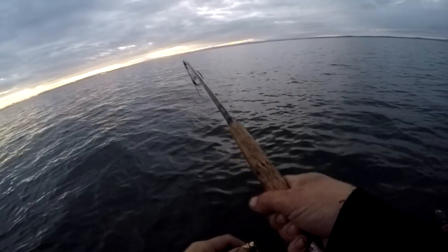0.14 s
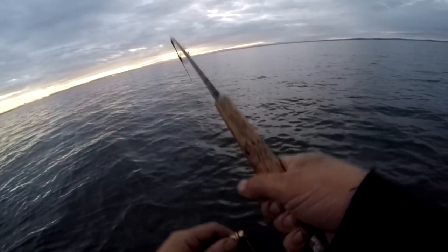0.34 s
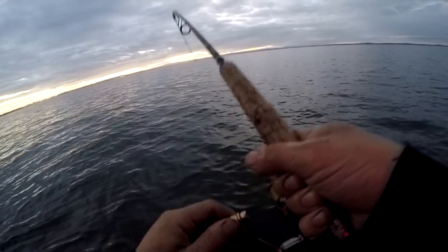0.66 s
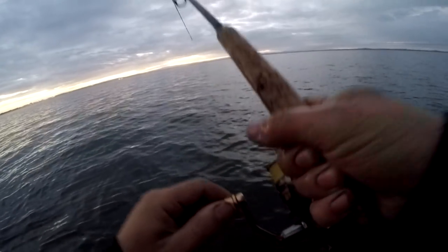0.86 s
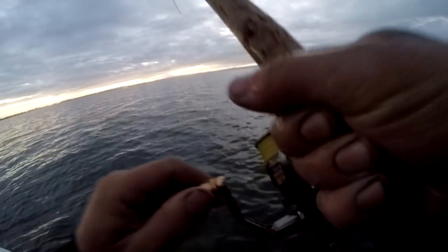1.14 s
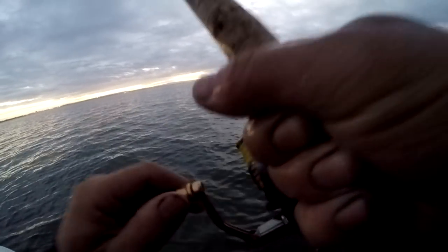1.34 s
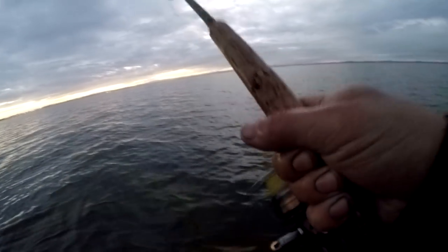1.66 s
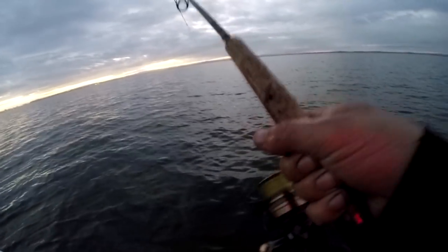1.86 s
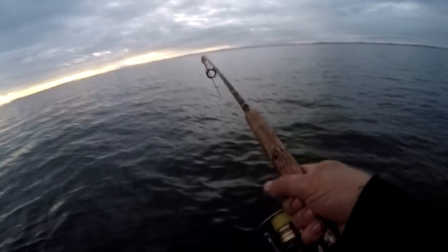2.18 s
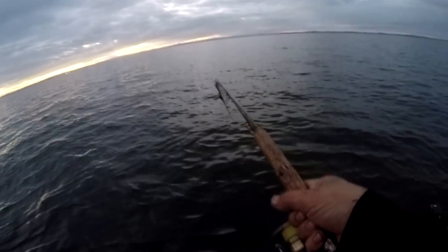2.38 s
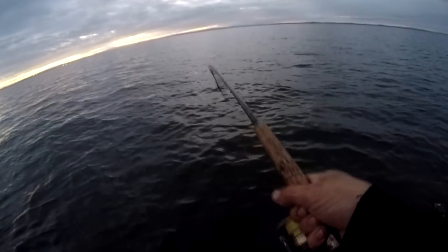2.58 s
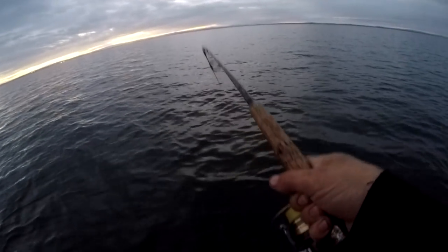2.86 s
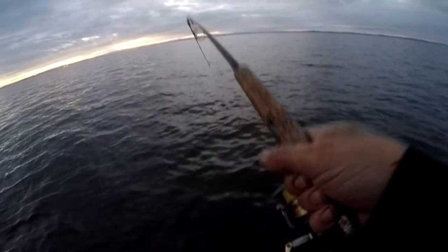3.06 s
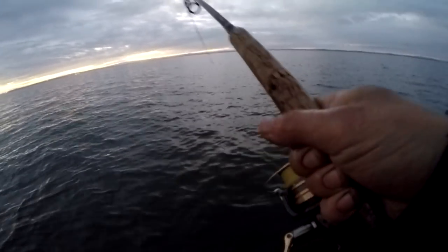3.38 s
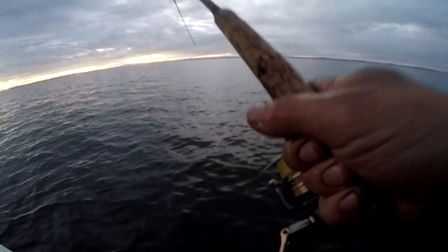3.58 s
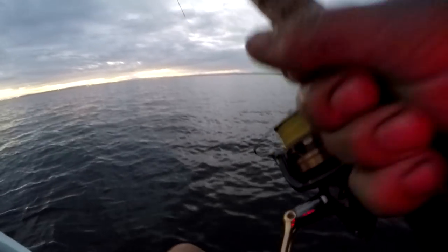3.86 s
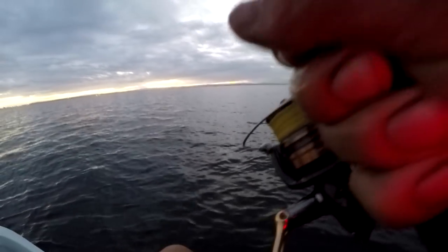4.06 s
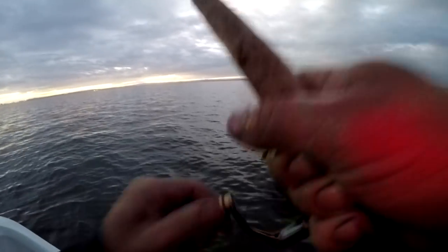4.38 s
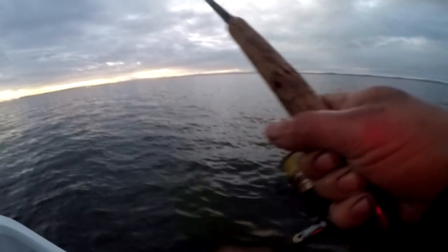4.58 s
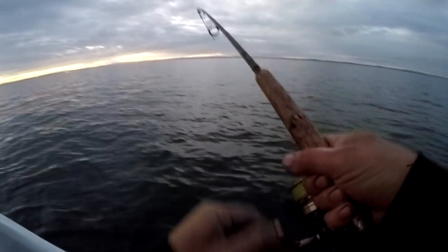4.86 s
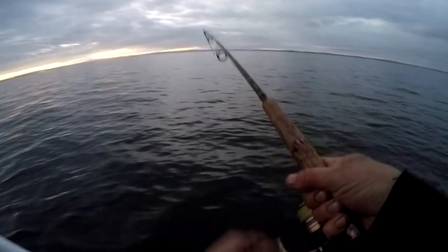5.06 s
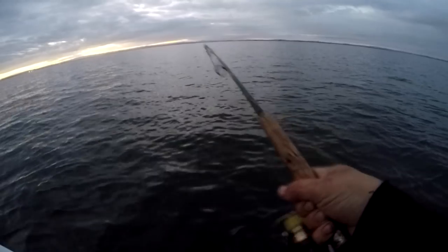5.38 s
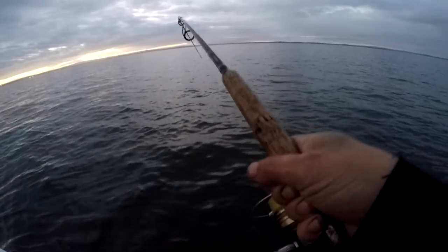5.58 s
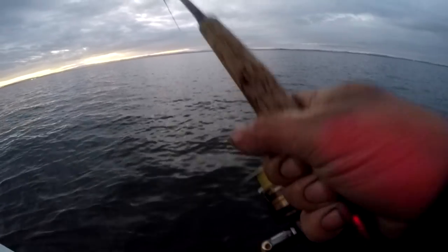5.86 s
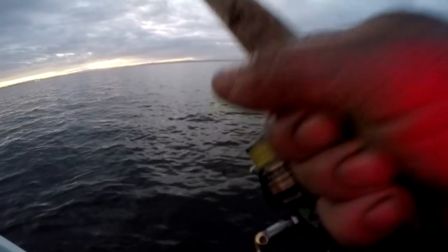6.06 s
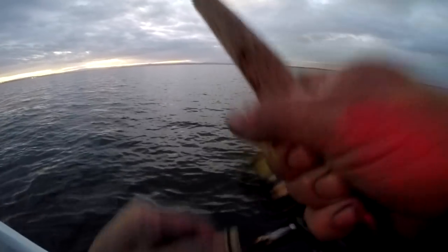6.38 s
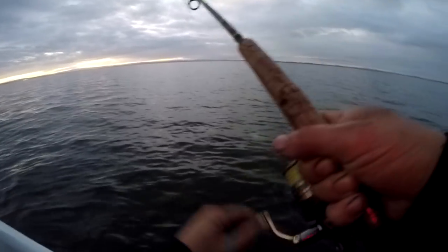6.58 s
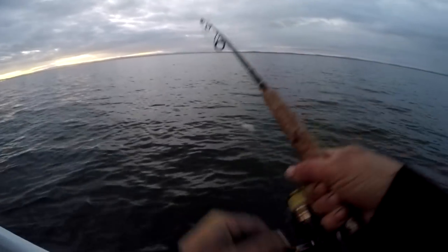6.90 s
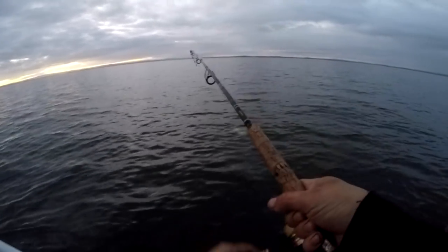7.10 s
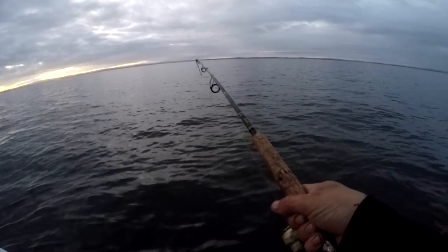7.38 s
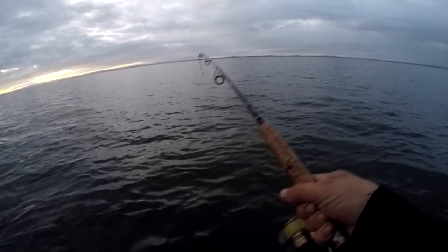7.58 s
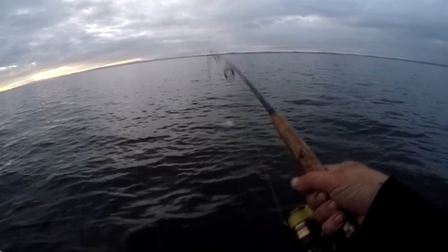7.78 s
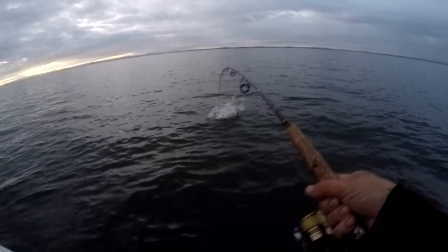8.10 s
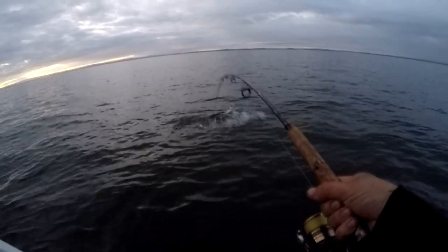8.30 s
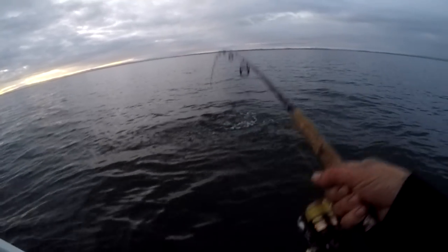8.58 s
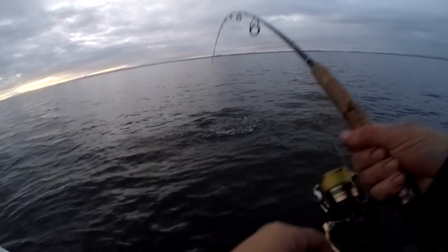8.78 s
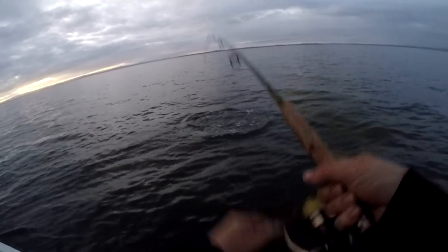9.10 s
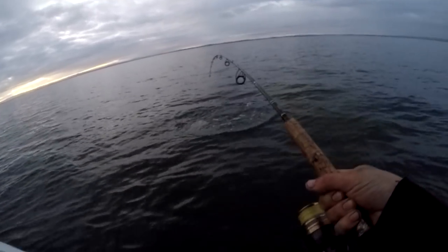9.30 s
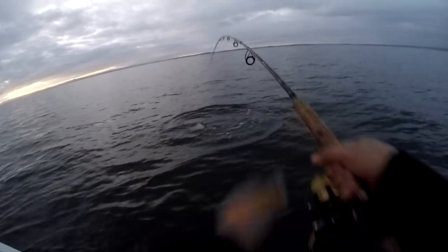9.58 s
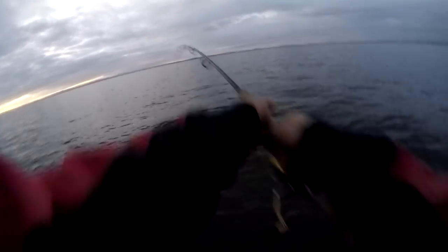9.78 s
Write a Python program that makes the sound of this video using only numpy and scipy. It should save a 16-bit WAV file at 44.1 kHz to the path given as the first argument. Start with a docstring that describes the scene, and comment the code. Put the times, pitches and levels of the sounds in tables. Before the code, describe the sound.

Close metallic reel ticks and soft gear whirring over low wind buffeting; a hard handle knock midway, then rod thumps, a fish splash and sleeve rustle.

```python
"""An angler in a small boat plays a fish, heard from a camera worn on the chest. From the start the drag clicks as
resonant snaps, a sleeve brushes by as filtered noise and waves plip as ringing bubbles. From 1.4 s the reel is
cranked in spells of pulsing noise; at 2.4 s and 8.4 s the fish takes line and the ticks run into a buzz. Decaying
modes make the handle's knocks from 4 s and the thumps of the jerked rod from 7.8 s; near 8.2 s the fish splashes in
bursts of noise, and at the end the arm sweeps past. Wind noise buffets and rumbles throughout, over a steady hiss."""
import sys
import numpy as np
from scipy.fft import rfft, irfft, next_fast_len
from scipy.io import wavfile
from scipy.ndimage import uniform_filter1d, map_coordinates

SR = 44100
rng = np.random.default_rng(int(sys.argv[2]) if len(sys.argv) > 2 else 0)


def transcribe(u):
    """Save the signal u as a 16-bit wav file named by the first command-line argument.

    u: samples, shape (n,) or (channels, n), limited to [-1, 1]; the rate is SR.
    q: integer samples, one column per channel.
    """
    v = np.clip(np.atleast_2d(u).T, -1, 1)
    q = np.round(v * 32767).astype(np.int16)
    wavfile.write(sys.argv[1], SR, q)


N = 438354  # length [samples]


def teeth(slip, first=0):
    """One row for each tooth that passes the pawl: its time, then the slip's other columns at that time."""
    s, rate, *cols = np.transpose(slip)
    t = np.arange(s[0], s[-1], 1 / SR)
    turned = np.cumsum(np.interp(t, s, rate)) / SR  # teeth passed so far
    times = np.interp(np.arange(first, turned[-1]), turned, t)
    return np.transpose([times] + [np.interp(times, s, col) for col in cols])


# The spool slips against the drag, one list a pull; the two rings are trimmed in drag():
# (time [s], teeth per second [1/s], tick level [dB], brightness [dB], click-spring ring [dB], rim ring [dB])
SLIPPING_PULLS = [
    [(1.518, 18.0, -48.0, -3.0, -72.5, -52.0), (1.596, 9.4, -49.0, -1.0, -69.5, -53.0),
     (1.841, 19.7, -47.5, 9.0, -71.0, -57.0), (1.971, 40.1, -46.0, 4.0, -76.5, -50.0),
     (2.018, 20.0, -47.5, -2.0, -73.0, -51.0), (2.132, 49.0, -48.5, 2.0, -64.0, -55.0),
     (2.258, 16.9, -47.5, 9.0, -71.0, -54.0), (2.348, 25.1, -51.0, 4.0, -71.0, -60.0),
     (2.398, 84.3, -51.5, -1.0, -69.0, -61.0)],
    [(2.736, 48.9, -56.5, -2.0, -75.0, -60.0), (2.807, 37.3, -54.0, 0.0, -74.0, -58.0),
     (2.863, 91.3, -52.0, 0.0, -71.0, -53.0), (3.071, 18.0, -53.5, 3.0, -82.0, -56.0),
     (3.199, 14.5, -55.0, 4.0, -76.0, -61.0), (3.325, 17.6, -53.0, 2.0, -81.0, -58.0)],
    [(3.369, 20.8, -52.5, -1.0, -80.0, -56.0), (3.437, 49.3, -49.5, 4.0, -77.0, -51.0),
     (3.567, 41.3, -47.5, 5.0, -73.0, -52.0), (3.702, 17.3, -51.0, 6.0, -78.0, -54.0),
     (3.998, 14.6, -50.0, -1.0, -78.0, -54.0), (4.193, 6.9, -48.5, -6.0, -80.0, -52.0)],
    [(4.297, 15.5, -48.0, -5.0, -77.0, -45.0), (4.387, 30.1, -49.0, -3.0, -73.0, -50.0),
     (4.501, 17.3, -52.0, 4.0, -67.0, -58.0), (4.726, 11.7, -50.0, 2.0, -67.0, -62.0),
     (4.89, 27.5, -49.0, -5.0, -76.0, -58.0)],
    [(4.933, 23.0, -51.5, -1.0, -74.0, -61.0), (5.183, 32.6, -51.5, -3.0, -76.0, -62.0),
     (5.23, 15.4, -51.5, 3.0, -72.0, -57.0), (5.306, 34.6, -50.5, -4.0, -73.0, -54.0),
     (5.396, 37.7, -52.0, 3.0, -79.0, -58.0), (5.436, 18.9, -49.0, -4.0, -73.0, -54.0),
     (5.484, 24.7, -52.0, -4.0, -77.0, -53.0), (5.579, 10.7, -52.5, 1.0, -75.0, -52.0)],
    [(5.733, 22.1, -53.5, 2.0, -77.0, -58.0), (5.863, 21.4, -52.5, -2.0, -75.0, -59.0),
     (6.029, 5.4, -51.0, 0.0, -75.0, -56.0)],
    [(6.403, 19.5, -45.5, -3.0, -77.0, -48.0), (6.451, 22.0, -45.5, -3.0, -72.0, -50.0),
     (6.724, 11.4, -52.5, 2.0, -64.0, -62.0), (6.811, 25.9, -49.0, -2.0, -71.0, -59.0),
     (7.033, 6.6, -52.5, -1.0, -81.0, -61.0), (7.16, 14.3, -54.0, -1.0, -74.0, -59.0)],
    [(7.627, 10.1, -51.0, -2.0, -78.0, -51.0), (7.728, 14.5, -52.5, -2.0, -81.0, -56.0),
     (7.771, 27.1, -47.0, -2.0, -74.0, -51.0), (7.846, 20.1, -51.0, 0.0, -74.0, -57.0),
     (7.93, 16.0, -52.0, 3.0, -64.0, -57.0), (8.014, 46.8, -53.0, 2.0, -74.0, -57.0),
     (8.178, 15.2, -49.0, -2.0, -76.0, -49.0)],
    [(8.197, 60.0, -50.5, -6.0, -66.0, -49.0), (8.229, 70.6, -49.0, -6.0, -64.0, -52.0),
     (8.335, 40.7, -50.0, -2.0, -75.0, -52.0), (8.405, 58.1, -56.0, -1.0, -68.0, -62.0)],
    [(8.611, 63.6, -55.0, -2.0, -71.0, -59.0), (8.709, 18.9, -51.0, -4.0, -76.0, -56.0),
     (8.784, 8.0, -49.5, -3.0, -77.0, -53.0), (8.962, 15.2, -48.0, -5.0, -78.0, -50.0)],
    [(9.024, 39.0, -48.0, -6.0, -81.0, -51.0), (9.172, 16.8, -50.5, 0.0, -80.0, -60.0),
     (9.234, 28.5, -51.5, -1.0, -76.0, -59.0), (9.273, 8.2, -53.0, 0.0, -74.0, -58.0),
     (9.361, 10.3, -53.5, 1.0, -71.0, -58.0), (9.4, 50.7, -51.0, -3.0, -70.0, -61.0),
     (9.518, 26.7, -50.0, -5.0, -71.0, -63.0), (9.556, 58.6, -49.5, -6.0, -77.0, -57.0)],
]
# Between pulls the spool creeps by a single tooth: (time [s], level [dB])
SINGLE_CREEPS = [(0.011, -52), (0.0437, -53), (0.1734, -54.5), (0.4214, -55), (0.6485, -53),
                 (0.7389, -51.5), (0.9034, -52), (1.204, -48), (6.2182, -47.5), (7.3113, -50.5),
                 (7.452, -50.5)]
CREEP_BRIGHT_DB, CREEP_SPRING_DB = -2, -75
# The fish takes line, one list a run: (time [s], ticks per second [1/s], level [dB])
LINE_RUNS = [
    [(2.395, 88, -51), (2.43, 117, -52), (2.49, 137, -52.5), (2.53, 220, -54), (2.56, 245, -54.5),
     (2.595, 240, -52), (2.635, 214, -55.5), (2.68, 220, -52.5), (2.705, 150, -53), (2.732, 79, -56)],
    [(8.405, 68, -54), (8.44, 97, -51.5), (8.485, 107, -50.5), (8.54, 123, -52), (8.58, 96, -53),
     (8.606, 55, -60)],
]
RUN_BRIGHT_DB, RUN_SPRING_DB = -2.5, -69.5
CREEP_RIM_DB, RUN_RIM_DB = -6.5, -0.5  # rim ring relative to the tick, before the trim in drag()


def ticks():
    """Every tick of the drag in order: (time [s], level, brightness, spring and rim [dB])."""
    rows = [(s, db, CREEP_BRIGHT_DB, CREEP_SPRING_DB, db + CREEP_RIM_DB) for s, db in SINGLE_CREEPS]
    for pull in SLIPPING_PULLS:
        rows += [tuple(tick) for tick in teeth(pull)]
    for run in LINE_RUNS:
        rows += [(s, db, RUN_BRIGHT_DB, RUN_SPRING_DB, db + RUN_RIM_DB) for s, db in teeth(run, first=.5)]
    return np.array(sorted(rows))


# Resonances of the drag's pawl and spool: (frequency [Hz], width [Hz], level [dB])
PAWL_RESONANCES = [(2810, 660, 1), (4970, 270, 1), (5614, 290, 3.5), (7470, 740, -1), (8740, 420, 1),
                   (11120, 630, 4.5), (13400, 740, -4.5), (14560, 180, 2)]
# Modes of the drag's click spring: (frequency [Hz], level [dB], t60 [s])
CLICK_SPRING = [(7670, 5, .21), (7750, -1, .16)]
# Modes of the spool's rim, low then high: (frequency [Hz], level [dB], t60 [s])
RIM_MODES = [(3767, -13.5, 0.089), (4744, 0.5, 0.028)]


def drag(snap_t60=0.013, rise_s=0.0002, fresh=0.63, drift_db=3.5, size_scatter_db=1.25, ring_scatter_db=4.0,
         spring_trim_db=1, rim_trim_db=1, bright_scatter_db=2, rest_s=0.08, rested_db=5):
    """The pawl snaps off each tooth; neighbouring teeth sound alike, so the colour drifts as the spool turns."""
    s, db, bright_db, springs_db, rims_db = ticks().T
    t = np.arange(SR // 6) / SR
    short = t[:SR // 25]
    grit, new, chance = rng.standard_normal((len(s), 3, len(short))).transpose(1, 0, 2)
    # part of the grit is shared by neighbouring teeth, part is fresh
    grit = unit(uniform_filter1d(grit, size=7, axis=0)) + fresh * new
    snaps = grit * amp(-60 * short / snap_t60) * (1 - np.exp(-short / rise_s))
    # the turning spool shows the microphone now one resonance, now another
    drift = unit(uniform_filter1d(chance.T[:len(PAWL_RESONANCES)], size=5, axis=1))
    pawl = body([(hz, width, peak_db + drift_db * d[:, None])
                 for (hz, width, peak_db), d in zip(PAWL_RESONANCES, drift)])
    # a hard, bright contact mainly drives the pawl's upper resonances
    hardness_db = bright_db + bright_scatter_db * chance[:, -2]

    def tilt(hz):
        return amp(hardness_db[:, None] * np.interp(hz, [7000, 10500, 12000, 14000], [0, 1, 1, .2]))

    snaps = filtered(snaps, lambda hz: pawl(hz) * tilt(hz))
    snaps /= snaps[:, :SR // 250].std(axis=1, keepdims=True)  # even out the first 4 ms
    snaps *= amp(db + size_scatter_db * chance[:, -1])[:, None]
    # the rim's low mode rings more freely when the spool is nearly still
    rests = np.minimum(np.diff(s, prepend=0) / rest_s, 1)
    (low_hz, low_db, low_t60), high_mode = RIM_MODES
    rims, springs = amp(rims_db + rim_trim_db), amp(springs_db + spring_trim_db)
    out = np.zeros(N)
    for at, snap, rim, spring, rest in zip(s, snaps, rims, springs, rests):
        add(out, at, snap)
        rim_modes = [(low_hz, low_db + rested_db * rest, low_t60), high_mode]
        bend = 1 + rng.normal() / 280  # the pitch of spring and rim shifts a little with the load
        side = rng.choice([-1, 1])  # each tooth catches the rim at another point
        add(out, at, side * rim * ring(rim_modes, bend * t, ring_scatter_db))
        add(out, at, spring * ring(CLICK_SPRING, bend * t, ring_scatter_db))
    return out


# Colour of the reel's whirr: (frequency [Hz], level [dB])
WHIRR_SPECTRUM = [(290, -64), (500, -23), (605, -26), (746, -5.5), (848, -17), (945, -8.5), (1480, -18.5),
                  (1680, -5), (1920, 1), (2220, -5), (2330, -5), (2720, -10.5), (2980, -4.5), (3500, -18),
                  (4400, -23.5), (5720, -35), (9680, -120)]
# Spells of turning the reel: (start [s], length [s], whirr level at the start [dB])
CRANK_SPELLS = [(1.36, 0.21, -63), (1.64, 0.38, -52), (2.19, 0.11, -56), (2.39, 0.29, -54.5),
                (2.54, 0.13, -53), (2.82, .14, -60.5), (3.42, 0.5, -64), (4.03, 0.22, -59.5),
                (4.27, 0.54, -49), (4.88, 0.54, -53), (5.06, 0.058, -52), (5.42, 0.5, -65),
                (6.07, .38, -64.5), (6.49, 0.15, -50.5), (6.72, 0.24, -52.5), (7.0, .04, -56.5),
                (7.1, 0.097, -54), (7.24, 0.12, -61), (7.68, 0.39, -61)]
CRANK_ATTACK_S, CRANK_SAG_DB_PER_S, CRANK_RELEASE_S = 0.06, 3.5, 0.05
# The rotor rubs and groans: (start [s], length [s], level at the start before the groan trim [dB])
ROTOR_GROANS = [(.8, .65, -80), (4.06, 0.086, -60), (4.26, 0.068, -53), (4.44, 0.16, -63),
                (6.27, 0.16, -71)]


def gears(groan_trim_db=1, mesh_hz=104, mesh_depth=0.043):
    """The whirr pulses with the gear teeth; the rubbing rotor drives one low resonance of the reel."""
    mesh_rate = mesh_hz * (1 + 0.11 * wobble(2.8))
    mesh = 1 + mesh_depth * np.sin(2 * np.pi * np.cumsum(mesh_rate) / SR)
    whirr = off_the_hands(noise(colour(WHIRR_SPECTRUM), grain_db=2) * mesh * amp(0.67 * wobble(35)))
    groan = noise(lambda hz: body([(778, 90, 0)])(hz) ** 2)
    turning = strokes(CRANK_SPELLS, CRANK_ATTACK_S, CRANK_SAG_DB_PER_S, CRANK_RELEASE_S)
    rubbing = strokes(ROTOR_GROANS, attack_s=0.059, sag_db_per_s=-7, release_s=0.021)
    return turning * whirr + line_rub(turning) + amp(groan_trim_db) * rubbing * groan


def line_rub(turning, rub_db=-9, rub_hz=1550, wander_octaves=.3):
    """The line rubs over its roller with a rough note that wanders as the tension changes."""
    phase = 2 * np.pi * np.cumsum(rub_hz * 2 ** (wander_octaves * wobble(7))) / SR
    grip = unit(uniform_filter1d(rng.standard_normal((2, N)), size=200, axis=1))
    note = grip[0] * np.sin(phase) + grip[1] * np.cos(phase)
    return amp(rub_db) * turning * unit(amp(2.2 * wobble(9)) * note)


# Resonances of the spinning spool: (frequency [Hz], width [Hz], level [dB])
SPINNING_SPOOL = [(2060, 110, 0), (2350, 130, 3.5), (3060, 110, 7), (3580, 160, -1), (4750, 92, -9),
                  (8100, 480, -8)]


def spool(whizz_db=-48):
    """In the first, fast run line whizzes off the spool, louder with speed; whizz_db holds at top speed."""
    s, rate, _ = np.transpose(LINE_RUNS[0])
    speed = np.interp(now(), s, rate / rate.max(), left=0, right=0)
    return amp(whizz_db) * speed ** 2 * noise(body(SPINNING_SPOOL), grain_db=3)


# Knocks of the handle: (time [s], hollow ring level [dB], clack level [dB], clack pitch [Hz])
HANDLE_KNOCKS = [(3.977, -62, -42, 1960), (4.004, -46.5, -50, 1190), (4.126, -54, -47, 1306),
                 (4.3565, -27.5, -32, 1794), (6.276, -49, -42, 1105), (6.279, -45, -47, 1990),
                 (6.306, -48, -46, 1900)]
# Modes of the reel's hollow body: (frequency [Hz], level [dB], t60 [s])
HOLLOW_REEL = [(791, -3.5, 0.071), (760, -32, 0.04), (335.8, -19, 0.052)]


def handle(clack_t60=0.033, crack_db=-2):
    """Play in the handle clacks and rings the reel's hollow body."""
    out, t = np.zeros(N), np.arange(SR // 8) / SR
    for s, hollow_db, clack_db, hz in HANDLE_KNOCKS:
        clack = ring([(hz, -3, clack_t60)], t) + amp(crack_db) * burst(hz, t, clack_t60)
        add(out, s, amp(hollow_db) * ring(HOLLOW_REEL, t) + amp(clack_db) * clack)
    return out


# Jerks of the rod:
# (time [s], rasp level [dB], rasp length [s], shrill level relative to the rasp [dB], thump level [dB])
ROD_JERKS = [(7.773, -41.5, 0.0059, -5.5, -31), (9.236, -39, 0.0059, -7.5, -34.5),
             (9.317, -34.5, 0.0088, -11, -39), (9.407, -38.5, 0.0044, 4, -32.5)]
# Resonances of the rasp: (frequency [Hz], width [Hz], level [dB])
RASP_RESONANCES = [(810, 560, -20), (1921, 20.4, 8.5), (2500, 340, -20), (7100, 1000, -32.5)]
# Resonances of the shrill part: (frequency [Hz], width [Hz], level [dB])
SHRILL_RESONANCES = [(3230, 67, 1.5), (4570, 200, -13), (5370, 300, -16.5)]


def rod(thump_delay_s=0.0139, thump_rise_s=0.0041):
    """Each jerk rasps briefly; a soft thump then reaches the camera through the angler's body."""
    out, t = np.zeros(N), np.arange(SR // 4) / SR
    rasp, shrill = noise(body(RASP_RESONANCES)), noise(body(SHRILL_RESONANCES))
    for s, db, length, shrill_db, thump_db in ROD_JERKS:
        width = np.where(now() < s, length / 2, length)  # swells faster than it fades
        swell = 1 / (1 + ((now() - s) / width) ** 4)
        jerk = unit(swell * rasp) + amp(shrill_db) * unit(swell * shrill)
        out += amp(db) * jerk * np.sqrt(np.mean(swell ** 2))
        thump = ring([(60, 0.0, 0.15), (103.6, 2.0, 0.19), (147, -6, 0.14)], t)
        add(out, s + thump_delay_s, amp(thump_db) * thump * (1 - np.exp(-t / thump_rise_s)))
    return out


# The sleeve brushes the jacket: (start [s], length [s], level [dB])
SLEEVE_BRUSHES = [(0, 0.014, -50.5), (.06, .06, -71.5), (.16, 0.061, -62), (.27, 0.034, -78),
                  (8.95, 0.23, -60.5), (9.15, 0.27, -52.5), (9.48, 0.063, -58)]
# The arm sweeps up past the camera: (time [s], level before the trims in jacket() [dB])
ARM_SWEEP = [(9.62, -67), (9.784, -46), (9.93, -35), (9.94, -39)]
# Colour of the sliding cloth: (frequency [Hz], level [dB])
CLOTH_SPECTRUM = [(120, -38), (200, -18), (292, -1.5), (418, -42), (735, -8.5), (967, -11), (1390, -12.5),
                  (1640, -5), (2160, -1), (2520, -11.5), (3050, -8), (3740, -24.5), (5270, -25),
                  (8230, -41), (12000, -42), (15600, -70), (22000, -120)]
# The jacket shifts against the camera's case: (start [s], length [s], level at the start [dB])
JACKET_SHIFTS = [(1.7, 0.082, -61.5), (5.04, 0.14, -58.5), (8.33, 0.16, -63)]
# Resonances of the case, rubbed by cloth: (frequency [Hz], width [Hz], level [dB])
CASE_RESONANCES = [(171, 44, 2.5), (306, 58, -4.5)]
# The sleeve swishes in glides: (start [s], end [s], start pitch [Hz], end pitch [Hz], level [dB])
SLEEVE_SWISHES = [(0, 0.324, 3340, 3290, -68), (4.507, 4.603, 1166, 1350, -57),
                  (4.636, 4.723, 1294, 1510, -60), (4.703, 4.786, 1650, 1990, -48),
                  (6.479, 6.733, 1253, 827, -60), (9.113, 9.248, 1403, 1290, -56.5)]


def jacket(sweep_trim_db=1, case_trim_db=-8):
    """Stiff cloth slides close to the camera; its weave sings a rough note that follows the speed of the arm."""
    sweep = level(ARM_SWEEP)
    stroke = strokes(SLEEVE_BRUSHES, attack_s=0.05, sag_db_per_s=0, release_s=0.038) + amp(sweep_trim_db) * sweep
    out = stroke * off_the_hands(noise(colour(CLOTH_SPECTRUM), grain_db=2.5))
    shifting = strokes(JACKET_SHIFTS, attack_s=0.048, sag_db_per_s=3, release_s=0.044)
    out += (amp(case_trim_db) * sweep + shifting) * noise(body(CASE_RESONANCES))
    for start, end, start_hz, end_hz, db in SLEEVE_SWISHES:
        n = int((end - start) * SR)
        weave = unit(uniform_filter1d(rng.standard_normal((2, N)), size=260, axis=1)[:, :n])
        phase = 2 * np.pi * np.cumsum(np.linspace(start_hz, end_hz, n)) / SR
        note = weave[0] * np.sin(phase) + weave[1] * np.cos(phase)
        add(out, start, amp(db) * np.hanning(n) * note)
    return out


def bubble(hz, cycles, glide=0.036, splat_db=-6):
    """A small splat, then the trapped bubble rings (60 dB down after `cycles`) and rises a little in pitch."""
    t = np.arange(SR // 15) / SR
    age = t * hz / max(cycles, 2)
    tone = np.sin(2 * np.pi * hz * t * (1 + glide * np.minimum(age, 1)))
    tone *= amp(-60 * age) * (1 - np.exp(-t * hz / 2))
    return tone + amp(splat_db) * burst(1.07 * hz, t, t60=0.019)


# The fish thrashes: (start [s], length [s], level at the start [dB])
FISH_THRASHES = [(8.18, 0.15, -55.5), (8.34, 0.059, -53.5), (8.44, 0.13, -47.5), (8.66, 0.14, -61)]
# Colour of the spray: (frequency [Hz], level [dB])
SPRAY_SPECTRUM = [(180, -44), (300, -29.5), (363, -12), (637, -16.5), (1350, -6), (1480, -17), (1710, 3.5),
                  (2290, -7), (3210, -1.5), (4400, -28), (5720, -50), (9680, -120)]
# Clear plips of water: (time [s], level before the plip trim [dB], pitch [Hz])
CLEAR_PLIPS = [(0.159, -44, 1960), (0.218, -44.5, 1880), (0.308, -48, 2000), (2.904, -47, 1370),
               (2.984, -46, 1350), (3.023, -48, 1358), (3.05, -45.5, 1338), (3.11, -51.5, 1334),
               (3.491, -40.5, 1930), (3.543, -43, 1240), (3.56, -46, 1380), (3.608, -44.5, 1400),
               (3.639, -45, 1352), (3.673, -48, 1380), (3.749, -46.5, 1844), (3.794, -43.5, 1360),
               (5.577, -46.5, 1640), (5.683, -53.5, 621.3), (7.494, -44, 1867), (8.18, -38, 2130),
               (8.198, -37, 2108), (8.337, -34.5, 1920), (8.405, -39, 1740), (8.477, -36, 1800),
               (8.582, -36.5, 1730)]
PLIP_CYCLES = 33.4


def water(plip_trim_db=2, lap_db=-64, lap_hz=1500, count=110):
    """The fish's splash is grainy noise; clear plips and faint lapping all round the hull are bubbles."""
    thrash = strokes(FISH_THRASHES, attack_s=0.023, sag_db_per_s=6, release_s=0.071)
    out = thrash * unit(noise(colour(SPRAY_SPECTRUM), grain_db=2.5) * amp(1.7 * wobble(90)))
    for s, db, hz in CLEAR_PLIPS:
        add(out, s, amp(db + plip_trim_db) * bubble(hz, PLIP_CYCLES))
    for when, size, pitch in rng.random((count, 3)):
        lap = bubble(lap_hz * 2 ** (1.4 * (pitch - .5)), cycles=64)
        add(out, when * N / SR, amp(lap_db + 10 * size ** 2) * lap)  # up to 10 dB over lap_db
    return out


# The breeze between gusts, buffet before its trim: (time [s], buffet level [dB], rumble level [dB])
STEADY_BREEZE = [(0, -41.5, -54.5), (.7, -53, -55.5), (1.0, -54, -54), (1.35, -48.5, -51.5),
                 (2.6, -49, -53.5), (3.15, -49, -58.5), (3.5, -47, -52), (3.8, -50, -55), (4.5, -50.5, -51),
                 (5.85, -46, -56), (6.05, -56.5, -56), (6.5, -51.5, -54), (8.55, -43, -56),
                 (8.77, -47.5, -58), (9.1, -52, -55), (9.94, -39.5, -58.5)]
# Gusts, buffet before its trim: (time of the peak [s], length [s], buffet level [dB], rumble level [dB])
WIND_GUSTS = [(0.18, 0.065, -41.5, -67), (0.882, 0.11, -46.5, -65), (1.777, 0.14, -42, -51),
              (1.94, .13, -42.5, -55.5), (2.24, 0.073, -47.5, -61), (2.512, 0.17, -39, -64),
              (4.36, 0.16, -48.5, -46), (4.546, .16, -52, -53), (4.832, 0.17, -41, -63),
              (5.244, 0.1, -40, -64), (5.382, 0.2, -40.5, -58), (6.36, 0.13, -44.5, -56),
              (6.94, 0.076, -38.5, -61), (7.33, 0.23, -46, -68), (7.694, .2, -55, -52),
              (8.03, 0.1, -45, -60), (8.44, 0.12, -42, -48.5), (9.361, 0.27, -38.5, -59),
              (9.903, 0.15, -53, -37)]
# Colour of the slow buffets: (frequency [Hz], level [dB])
BUFFET_SPECTRUM = [(8.8, -14), (15, 7), (28, -2.5), (55, -14), (90, -35), (120, -72), (200, -120)]
# Colour of the rumble: (frequency [Hz], level [dB])
RUMBLE_SPECTRUM = [(35, -35), (60, 2.5), (118, -5), (173, -10), (231, -19), (291, -20), (333, -27),
                   (385, -32.5), (600, -35), (780, -39), (1320, -120)]


def wind(buffet_trim_db=3, flutter_db=1.7):
    """Slow eddies buffet the microphone, smaller ones rumble above them; bell-shaped gusts ride on the breeze."""
    buffet_power, rumble_power = level(STEADY_BREEZE) ** 2, level(STEADY_BREEZE, axis=2) ** 2
    for s, length, gust_buffet_db, gust_rumble_db in WIND_GUSTS:
        bell = np.exp(-np.minimum((2 * (now() - s) / length) ** 2, 20))
        buffet_power += amp(gust_buffet_db) ** 2 * bell
        rumble_power += amp(gust_rumble_db) ** 2 * bell
    eddies = noise(colour(BUFFET_SPECTRUM))
    # even out the eddies, so that mainly breeze and gusts set their strength
    eddies /= np.sqrt(np.abs(uniform_filter1d(eddies ** 2, size=SR // 12)) + 0.036)
    rumble = amp(flutter_db * wobble(14)) * noise(colour(RUMBLE_SPECTRUM))
    return amp(buffet_trim_db) * np.sqrt(buffet_power) * eddies + np.sqrt(rumble_power) * rumble


# Colour of the open water and microphone: (frequency [Hz], level [dB])
HISS_SPECTRUM = [(210, -44), (350, -2), (591, -6), (761, -5.5), (1440, -6.5), (1940, -1.5), (2500, -8),
                 (2930, -5), (4030, -11), (4790, -8), (6380, -13), (13400, -18), (15500, -19.5)]


def hiss(hiss_db=-64):
    """Open water and the microphone's own noise make a steady coloured hiss."""
    return amp(hiss_db) * noise(colour(HISS_SPECTRUM))


def amp(db):
    """dB to gain."""
    return 10 ** (np.asarray(db) / 20)


def unit(x):
    """Each row at rms 1."""
    return x / np.sqrt(np.mean(x ** 2, axis=-1, keepdims=True) + 1e-20)


def now():
    """Time of every sample, in s."""
    return np.arange(N) / SR


def level(rows, axis=1):
    """Gain per sample from a dB column, all but silent outside the table."""
    cols = np.transpose(rows)
    return amp(np.interp(now(), cols[0], cols[axis], left=-140, right=-140))


def wobble(rate):
    """A smooth random curve, rate knots a second."""
    return map_coordinates(rng.standard_normal(int(N * rate / SR) + 4), [now() * rate])


def filtered(x, response):
    """x filtered by a complex response of frequency."""
    n = x.shape[-1]
    m = next_fast_len(n + 4096)  # padding keeps the tail from wrapping round
    return irfft(rfft(x, m) * response(np.fft.rfftfreq(m, 1 / SR)), m)[..., :n]


def colour(points):
    """Response through (frequency [Hz], level [dB]) points on a log axis."""
    f, db = np.transpose(points)
    return lambda hz: amp(np.interp(np.log(hz + 1), np.log(f), db))


def body(peaks):
    """Causal response of (frequency [Hz], width [Hz], level [dB]) resonances, in alternating polarity."""
    def response(f):
        return sum(amp(db) * 1j * f * w / (c * c - f * f + 1j * f * w) * (-1) ** k
                   for k, (c, w, db) in enumerate(peaks))
    return response


def noise(response, grain_db=0):
    """Noise of rms 1; grain_db breaks it into tiny contacts."""
    return unit(filtered(rng.standard_normal(N) * amp(grain_db * wobble(700)), response))


def ring(modes, t, scatter_db=1):
    """Decaying modes, at new strengths for every blow."""
    return sum(amp(db + scatter_db * rng.normal() - 60 * t / t60) * np.sin(2 * np.pi * hz * t)
               for hz, db, t60 in modes)


def burst(hz, t, t60):
    """A short damped crack of peak 1 around one frequency."""
    x = filtered(rng.standard_normal(len(t)) * amp(-60 * t / t60), lambda f: body([(hz, .7 * hz, 0)])(f) ** 2)
    return x / np.abs(x).max()


def add(track, s, sound):
    """Mix a sound in at time s."""
    start = int(np.clip(round(s * SR), 0, N))
    track[start:start + len(sound)] += sound[:N - start]


def off_the_hands(x):
    """The moving hands reflect the sound at a drifting delay, which makes it swirl."""
    delay_s = .0022 * np.exp(.13 * wobble(3))
    return unit(x + .45 * np.interp(now() - delay_s, now(), x))


def strokes(rows, attack_s, sag_db_per_s, release_s):
    """Gain of (start, length, dB) movements: each swells up to its start, sags (grows if negative), then dies."""
    t, power = now(), np.zeros(N)
    for start, length, db in rows:
        near = slice(*np.searchsorted(t, [start - attack_s, start + length + 6 * release_s]))
        age = t[near] - start
        gain = (1 + np.minimum(age, 0) / attack_s) * np.exp(-np.maximum(age - length, 0) / release_s)
        power[near] += (gain * amp(db - sag_db_per_s * age)) ** 2
    return np.sqrt(power)


def scene():
    """Reel, angler, water and wind, all close to the one microphone."""
    reel = drag() + gears() + spool() + handle()
    angler = rod() + jacket()
    return (reel + angler + water() + wind() + hiss())[None]


def record(dry, top_hz=15300):
    """The camera keeps next to nothing above its band limit."""
    return filtered(dry, lambda hz: 1 / np.sqrt(1 + (hz / top_hz) ** 120))


dry = scene()
out = record(dry)
transcribe(out)
```